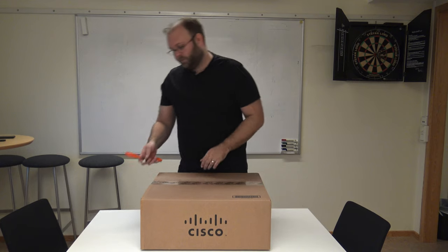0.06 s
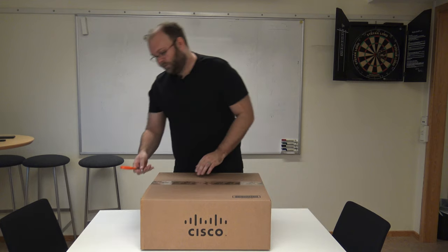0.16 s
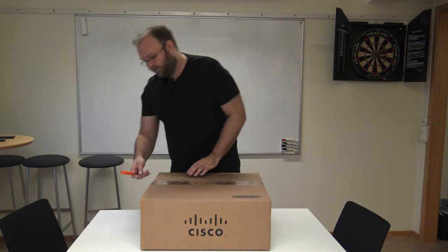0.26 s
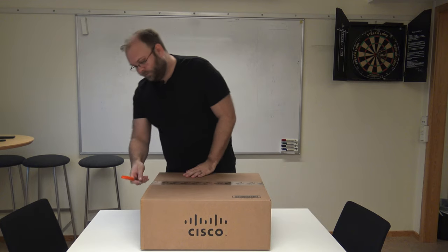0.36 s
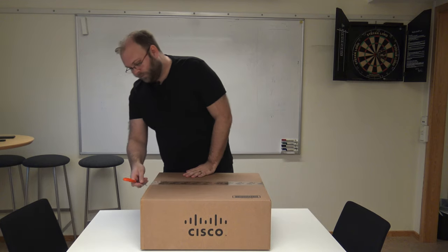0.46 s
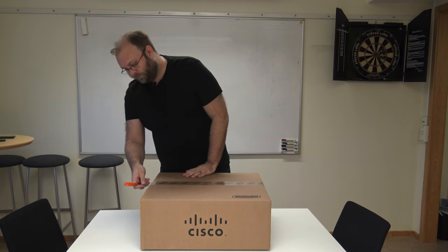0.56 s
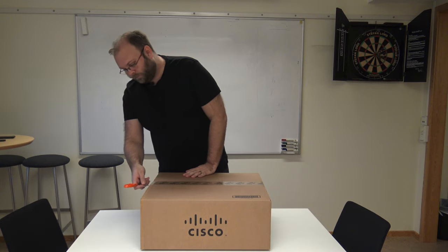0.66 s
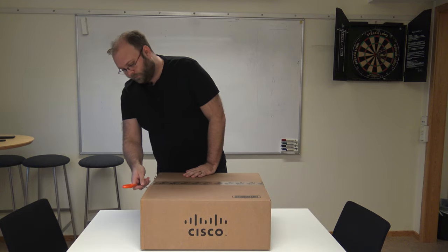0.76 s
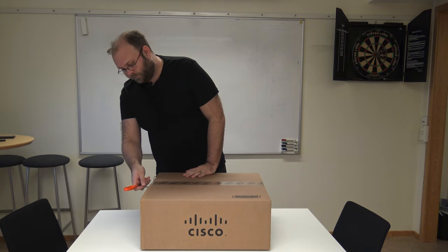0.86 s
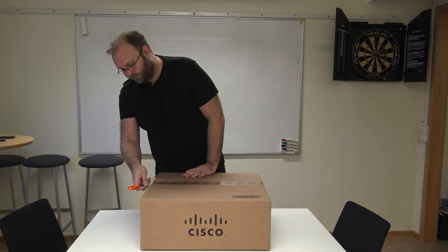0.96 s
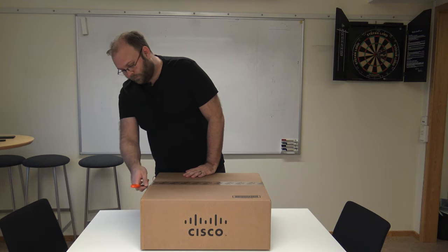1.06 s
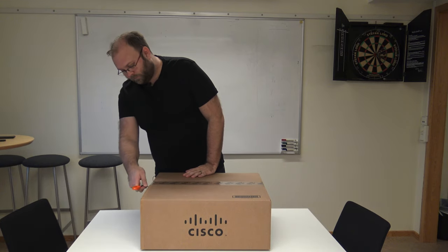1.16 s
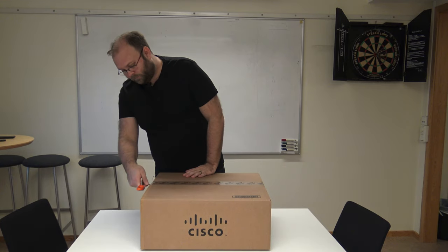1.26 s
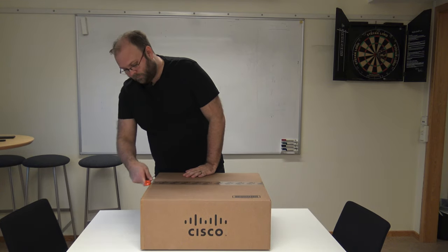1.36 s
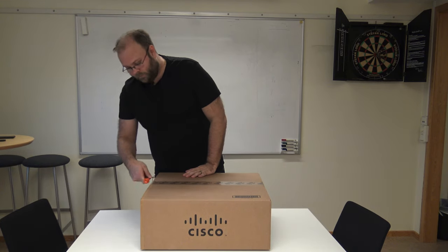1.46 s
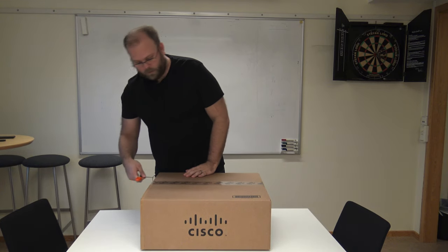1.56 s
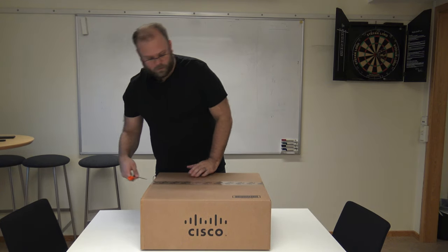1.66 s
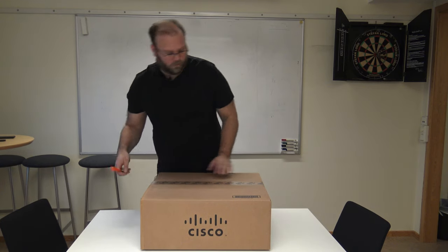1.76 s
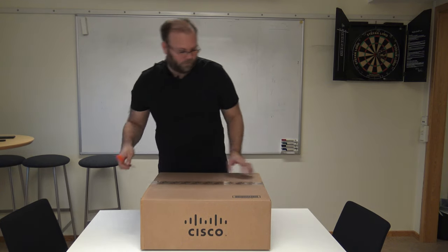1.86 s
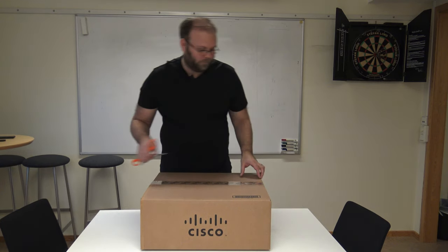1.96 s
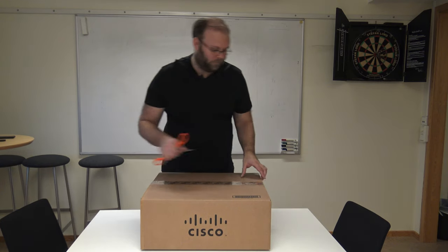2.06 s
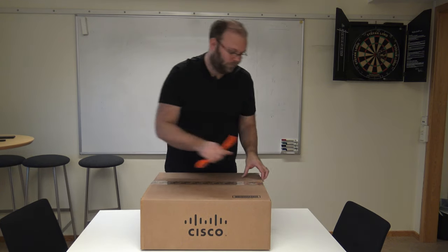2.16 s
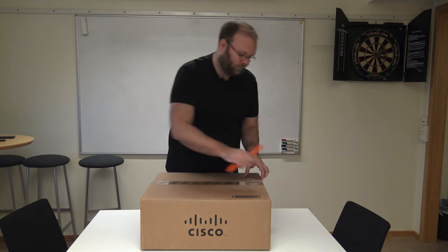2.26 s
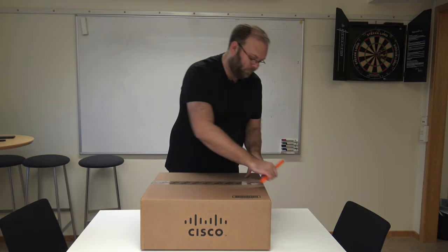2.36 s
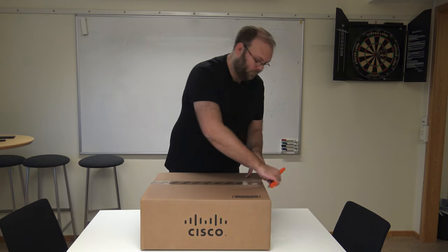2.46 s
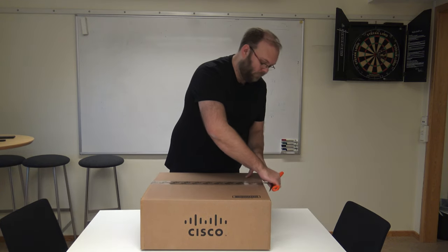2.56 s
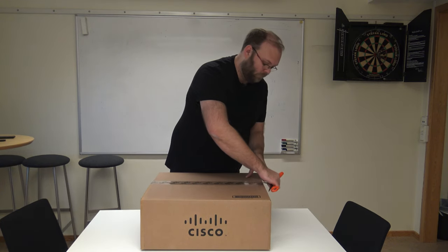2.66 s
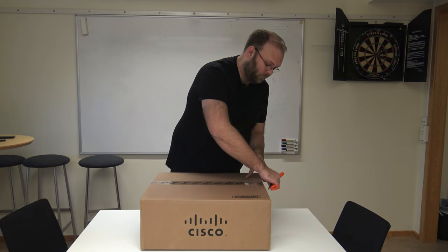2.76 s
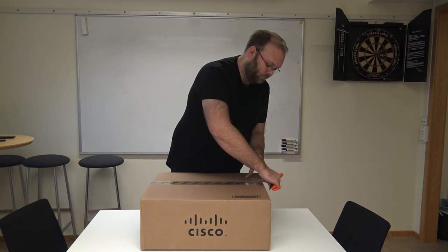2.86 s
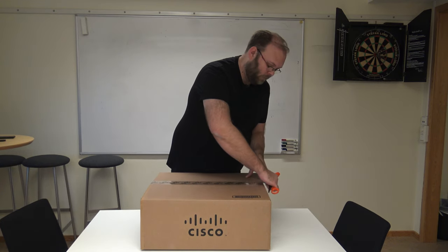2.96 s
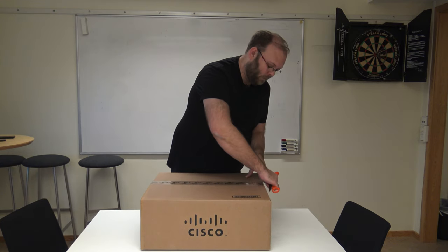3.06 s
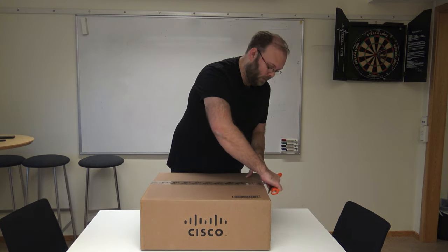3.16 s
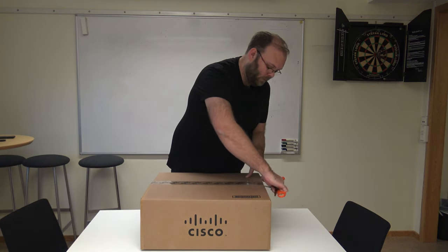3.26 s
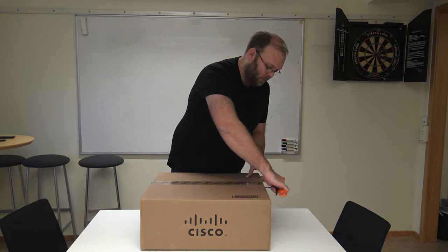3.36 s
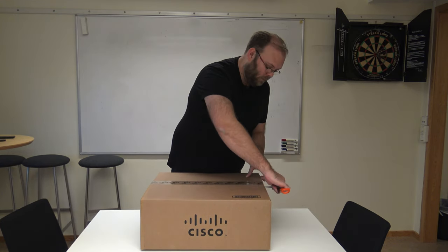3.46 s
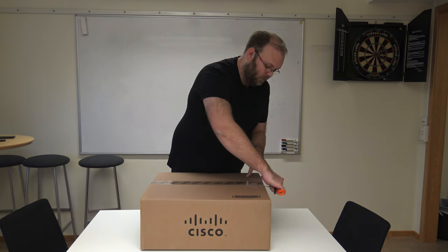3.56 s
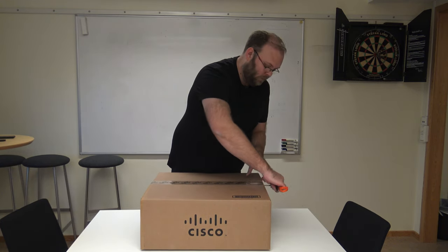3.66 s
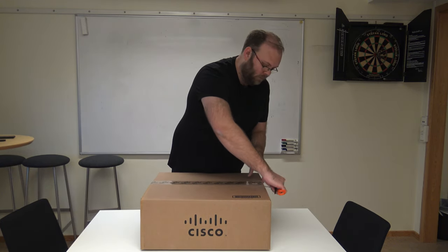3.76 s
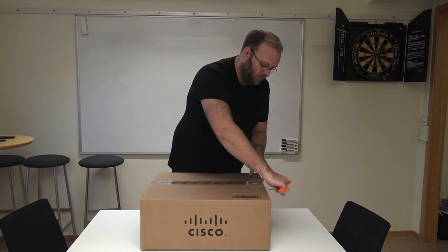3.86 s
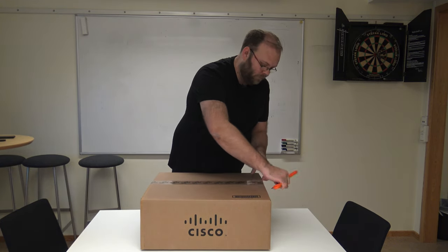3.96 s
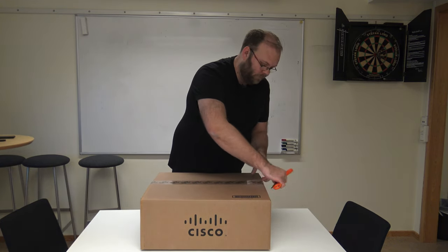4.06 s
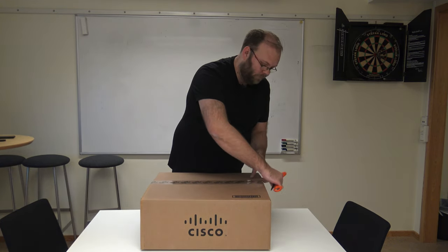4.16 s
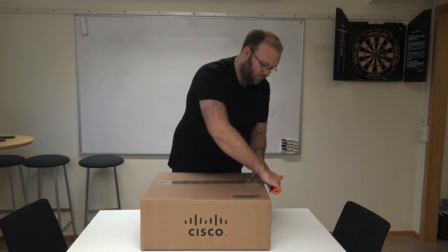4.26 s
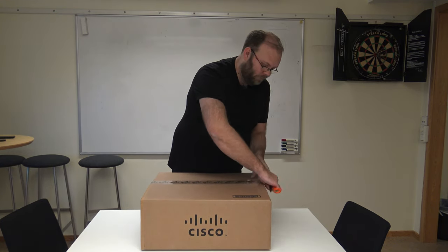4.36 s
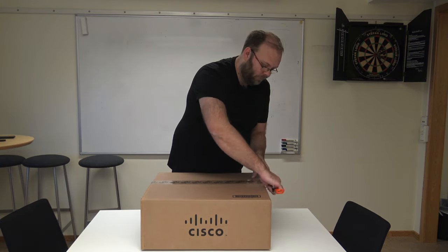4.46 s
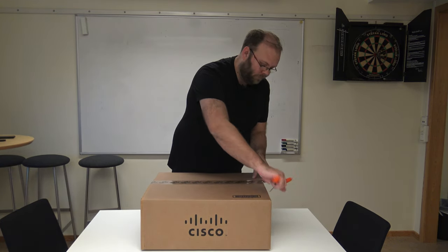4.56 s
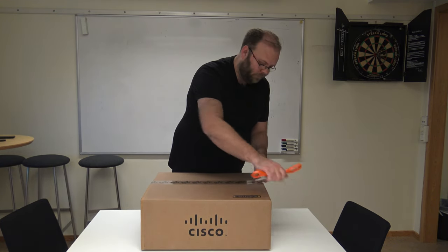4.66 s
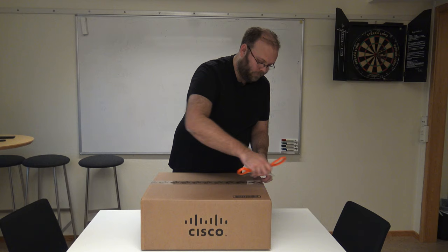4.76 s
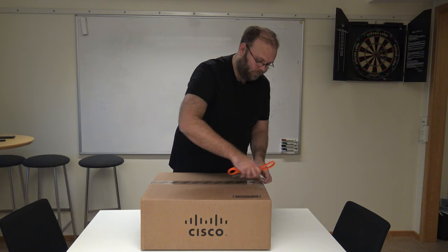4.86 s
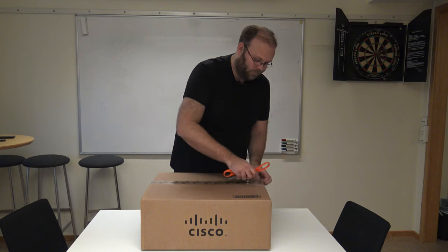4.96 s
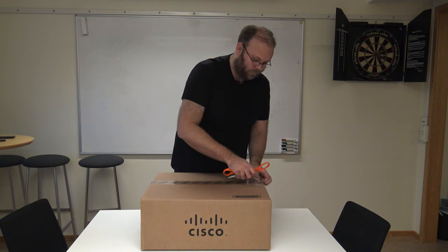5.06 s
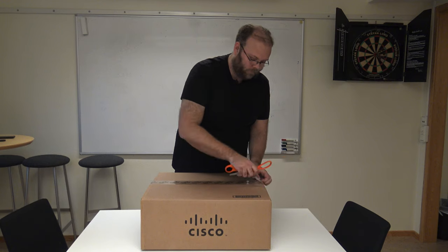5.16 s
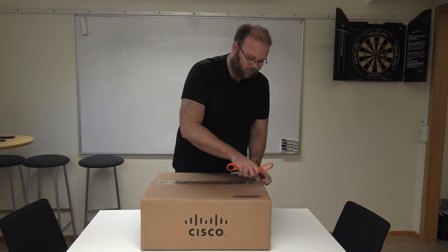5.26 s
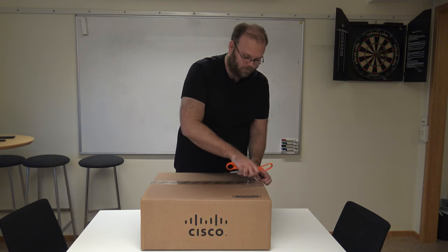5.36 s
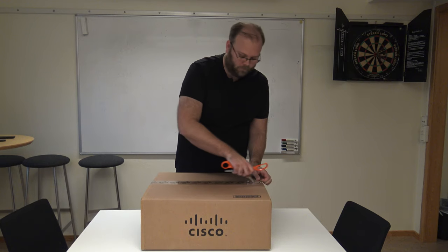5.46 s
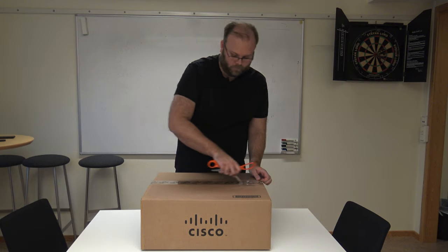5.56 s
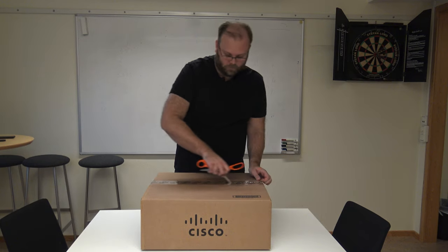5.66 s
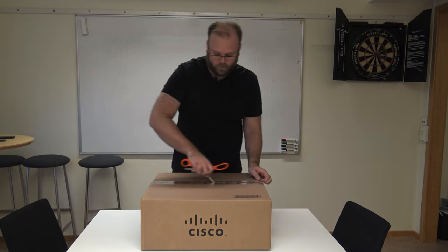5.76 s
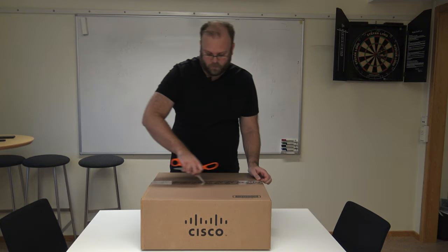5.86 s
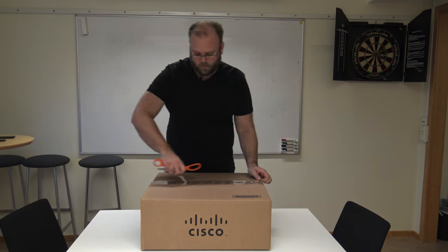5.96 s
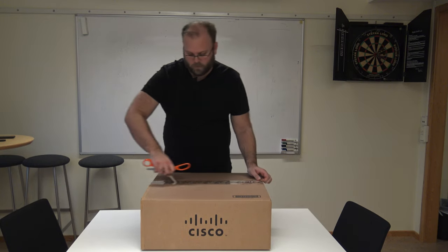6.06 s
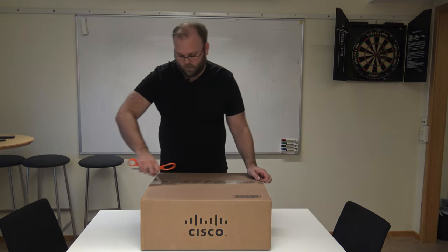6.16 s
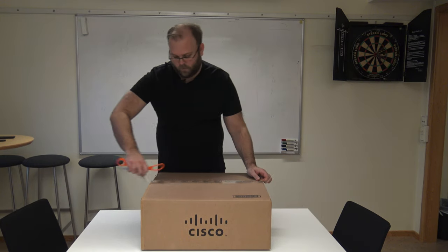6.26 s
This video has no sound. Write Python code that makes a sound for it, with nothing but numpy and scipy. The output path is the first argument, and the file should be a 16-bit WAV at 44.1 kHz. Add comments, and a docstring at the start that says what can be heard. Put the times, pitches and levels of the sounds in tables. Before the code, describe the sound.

Scissor blades clink, then cut in short snapping, knocking strokes at a cardboard box's taped ends before a long hissing scrape along its seam.

```python
"""Scissors open the packing tape of a cardboard box on a table in a bare, echoing room.
The blades, modelled as ringing steel modes and rubbing noise, clink; tape snaps as short bursts of noise.
Short strokes at the ends, then a long pull along the top seam, hiss and rasp as streams of random tiny jerks.
Knocks and slips ring the panel modes of the hollow box, and sleeves rustle over a quiet ventilation rumble.
A single microphone hears it all, directly and off the walls; both channels are the same."""
import sys
import numpy as np
from scipy import signal
from scipy.fft import rfft, irfft, next_fast_len
from scipy.io import wavfile
from scipy.ndimage import uniform_filter1d, map_coordinates

SR = 44100
rng = np.random.default_rng(int(sys.argv[2]) if len(sys.argv) > 2 else 0)


def transcribe(u):
    """Save the signal u as a 16-bit wav file named by the first command-line argument.

    u: samples, shape (n,) or (channels, n), limited to [-1, 1]; the rate is SR.
    q: integer samples, one column per channel.
    """
    v = np.clip(np.atleast_2d(u).T, -1, 1)
    q = np.round(v * 32767).astype(np.int16)
    wavfile.write(sys.argv[1], SR, q)


N = 278712  # samples

# short strokes of the blade at the ends of the box, levels at mid-stroke:
# start_s, length_s, tape_hiss_db, flap_rasp_db, box_boom_db, swell_db (start to end), hiss_pitch_hz
END_STROKES = [(0.968, 0.21, -66, -57.5, -62.5, 5, 7040), (1.297, 0.03, -47.5, -40, -64, 9, 5470),
               (1.345, 0.086, -45, -39, -40.5, 7, 6550), (1.443, 0.16, -53.5, -47.5, -49, -6, 5600),
               (1.636, 0.072, -61.5, -57, -59.5, -9, 7000), (3.02, 0.077, -62, -57, -63, -0.5, 8360),
               (3.209, 0.1, -51.5, -50, -57.5, 4.5, 8600), (3.333, 0.044, -41.5, -43.5, -39, 0, 8000),
               (3.41, 0.049, -53, -49, -54, -7, 5450), (3.601, 0.08, -52, -51.5, -55.5, 8.5, 8000),
               (3.879, 0.054, -53, -53.5, -53, 9, 8600), (4.229, 0.022, -52, -63, -50.5, 5, 11000),
               (4.29, 0.072, -69, -63, -59, 8, 6500), (4.404, 0.056, -66, -52.5, -54.5, -3, 7000),
               (4.469, 0.11, -51, -42.5, -49, 5, 5800), (4.595, 0.048, -47.5, -51, -50, -12, 10500),
               (5.33, 0.021, -51.5, -73, -36, 1, 7900)]
# the long pull along the top seam, levels before the layer trims: time_s, tape_hiss_db, box_boom_db, hiss_pitch_hz
SEAM_PULL = [(5.44, -72, -57, 8500), (5.498, -53.5, -48, 8600), (5.584, -46.5, -43, 8300),
             (5.684, -45.5, -42, 7600), (5.724, -44.5, -30, 6300), (5.81, -44, -34.5, 9900),
             (5.85, -45, -36, 6800), (5.94, -47.5, -31, 6550), (6.0, -46.5, -32, 8100),
             (6.07, -44, -31.5, 6200), (6.1, -46.5, -37, 8600), (6.135, -48, -32.5, 8500),
             (6.274, -47.5, -35.5, 8000), (6.32, -47, -46, 8000)]


def amp(db):
    """Decibels to gain."""
    return 10 ** (np.asarray(db) / 20)


def unit(x):
    """Scale to rms 1."""
    return x / np.sqrt(np.mean(x ** 2) + 1e-20)


def attack_unit(x):
    """Scale so that the loudest 4 ms have rms 1."""
    return x / np.sqrt(uniform_filter1d(x ** 2, size=176).max())


def along(points, hz):
    """Read a curve of (Hz, value) points, joined on a log frequency axis."""
    point_hz, values = np.transpose(points)
    return np.interp(np.log(hz + 1), np.log(point_hz + 1), values)


def curve(rows):
    """One value per sample for each column after the time."""
    times, *columns = np.transpose(rows)
    return [np.interp(np.arange(N) / SR, times, column) for column in columns]


def filtered(x, response):
    """Multiply the spectrum of x by a response of frequency."""
    size = next_fast_len(len(x) + 8192)  # silence after the end, so the filter's tail does not wrap
    spectrum = rfft(x, size) * response(np.fft.rfftfreq(size, 1 / SR))
    return irfft(spectrum, size)[:len(x)]


def coloured(x, colour):
    """Filter x by a curve of (Hz, dB) points, at rms 1."""
    return unit(filtered(x, lambda hz: amp(along(colour, hz))))


def wobble(rate):
    """A smooth random curve, rate knots a second."""
    knots = rng.standard_normal(int(N * rate / SR) + 4)
    return map_coordinates(knots, [np.arange(N) * rate / SR])


def add(track, s, sound):
    """Mix a sound in at s seconds."""
    part = track[max(round(s * SR), 0):][:len(sound)]
    part += sound[:len(part)]


def reach(hz, centre_hz, octaves):
    """A hump on the octave axis: the part of the spectrum that a contact excites."""
    distance = np.log2((hz + 1) / centre_hz) / octaves
    return 1 / (1 + distance ** 2)


def crack(centre_hz, octaves, t60, rise_cycles=0.3):
    """A toneless burst: dying noise, its spectrum evened out round a centre; dull bursts start more softly."""
    t = np.arange(SR // 12) / SR
    burst = rfft(rng.standard_normal(len(t)) * amp(-60 * t / t60))
    hump = reach(np.fft.rfftfreq(len(t), 1 / SR), centre_hz, octaves) ** 2
    even = irfft(burst / np.abs(burst) ** .8 * hump, len(t))  # most of the noise's own peaks are flattened
    rise = 1 - np.exp(-t * centre_hz / rise_cycles)
    fade = np.cos(np.pi / 2 * t / t[-1]) ** 2
    return attack_unit(even * rise * fade)


def slips(rate, spread_db):
    """Stick and slip: tiny jerks at random times, about rate a second, of very unequal size, at rms 1."""
    happens = rng.random(N) < rate / SR
    return unit(happens * rng.standard_normal(N) * amp(spread_db * rng.standard_normal(N)))


def stroke(start, length, swell_db):
    """Gain of one hand movement: a quick attack, a hold that swells or sags, a release."""
    attack_s, release_s, fade_db = 0.018, 0.041, 32.5  # each time is that of a fade by fade_db
    t = np.arange(N) / SR - start
    outside = np.maximum(-t / attack_s, 0) + np.maximum((t - length) / release_s, 0)
    gain_db = swell_db * (np.clip(t / length, 0, 1) - .5) - fade_db * outside
    return amp(np.maximum(gain_db, -200))


def panels(centre_hz, octaves, scatter_db):
    """The cardboard's ring after one push: damped modes, strongest near the centre of the push."""
    # cardboard panel modes: mode_hz, level_db (before scatter), t60_s
    box_modes = [(94, 2, 0.11), (118.5, 3.5, 0.073), (193, -1.5, 0.027), (248.2, -3.5, 0.061),
                 (285.3, 0, 0.029), (343.5, -0.5, 0.025), (460, -1, 0.039), (538, 2.5, 0.014),
                 (714, 5.5, 0.012), (919, 1.5, 0.019), (1070, 2, 0.015), (1228, -0.5, 0.022),
                 (1427, 4, 0.0067), (1752, 3, 0.011), (2170, 4.5, 0.0041), (2810, -59, 0.003)]
    hz, db, t60 = np.transpose(box_modes)[:, :, None]
    t = np.arange(SR // 12) / SR
    sign = (-1) ** np.arange(len(hz))[:, None]  # neighbouring modes push opposite ways
    size = sign * reach(hz, centre_hz, octaves) * amp(db + scatter_db * rng.standard_normal(hz.shape))
    return np.sum(size * amp(-60 * t / t60) * np.sin(2 * np.pi * hz * t), axis=0)


def shaken(jerks, centre_hz, octaves):
    """A run of jerks through the box's panels, at rms 1."""
    return unit(signal.oaconvolve(jerks, panels(centre_hz, octaves, scatter_db=1))[:N])


def background():
    """Steady ventilation rumble and hiss over a slow drift of air pressure."""
    # colour of the quiet room: hz, level_db (relative)
    room_air = [(12, -33), (20, 1), (39, -1), (74, -18), (127, -7.5), (228, -17), (434, -19), (1530, -31.5),
                (2320, -33), (2820, -37.5), (6540, -33), (11400, -41), (16000, -39)]
    drift_colour = [(1, -20), (2.5, 0), (7, 0), (11, -25), (40, -70), (200, -120)]  # hz, level_db
    drift = filtered(rng.standard_normal(N), lambda hz: amp(along(drift_colour, hz)))
    ventilation = coloured(rng.standard_normal(N), room_air)
    return amp(-59.0) * ventilation + amp(-51.5) * unit(drift)


def clinks(ring_db=-4, bite_s=0.0021, octaves=0.47):
    """The blades grind past each other; the rubbing rings their modes, damped by the hand."""
    # the scissor blades: mode_hz, level_db (relative), t60_s
    blade_modes = [(1230, -11, .05), (2584, 12, 0.11), (2970, 9, .12), (3990, 6, .1), (4570, 2, 0.11),
                   (5389, -13, 0.068), (6070, 5, 0.054), (6400, -2, 0.041), (6800, -3, 0.091),
                   (7130, -1, 0.062), (7144, -6, 0.066), (7305, -2, 0.075), (7440, 5, 0.057),
                   (7990, 6, 0.06), (9000, 7, 0.054), (9840, 7, 0.11), (10140, 5, 0.038),
                   (10430, -1, 0.054), (11380, 6, 0.041), (11750, -3, .08)]
    # colour of steel rubbing on steel: hz, level_db (relative)
    grind_colour = [(500, -28), (1200, -1.5), (2400, -10), (4000, -12), (7000, 4), (8800, -8), (11000, 1),
                    (13000, -10), (16000, -4)]
    # the blades meet: time_s, level_db, rub_t60_s, centre_hz (of the excited modes)
    meetings = [(0.013, -44.5, 0.26, 7050), (0.046, -29.5, 0.039, 8200), (0.056, -40.5, 0.18, 7500),
                (0.186, -59, 0.06, 6500), (1.833, -42.5, 0.057, 10400), (1.84, -54, 0.052, 5970),
                (2.043, -43.5, 0.043, 10200)]
    track, t = np.zeros(N), np.arange(SR // 3) / SR
    hz, mode_db, t60 = np.transpose(blade_modes)[:, :, None]
    modes = amp(mode_db - 60 * t / t60) * np.sin(2 * np.pi * hz * t)
    for s, db, rub_t60, centre_hz in meetings:
        force = amp(-60 * t / rub_t60) * (1 - np.exp(-t / bite_s))
        rub = force * coloured(rng.standard_normal(len(t)), grind_colour)
        ring = np.sum(modes * reach(hz, centre_hz, octaves), axis=0)
        steel = signal.fftconvolve(force * rng.standard_normal(len(t)), ring)[:len(t)]
        clink = attack_unit(rub) + amp(ring_db) * attack_unit(steel)
        add(track, s, amp(db) * attack_unit(clink))
    return track


def brush():
    """Sleeve and palm rustle softly as the arms move: dense random slips of cloth."""
    # arm movements: start_s, length_s, level_db (at mid-move), swell_db (start to end)
    arm_moves = [(0.4, 0.29, -70, -12), (0.836, 0.0058, -58, 11), (2.298, 0.69, -68.5, -13),
                 (2.71, 0.167, -64.5, 11), (4.978, 0.054, -64, -1)]
    # colour of the rustle: hz, level_db (relative)
    cloth_colour = [(59, -48), (100, -5.5), (260, -9), (442, -7), (736, -13.5), (1330, -18), (1870, -19),
                    (2800, -26), (11200, -24), (16000, -36)]
    moves = sum(amp(db) * stroke(start, length, swell_db) for start, length, db, swell_db in arm_moves)
    return moves * coloured(slips(rate=8100, spread_db=5.0), cloth_colour)


def knocks(crush_db=-1, crush_grows=0.53, crush_spread=1.71, crush_cycles=12):
    """A blow rings the panels and crushes the cardboard's flutes; the harder it is, the more the toneless thud prevails."""
    # hand or blade knocks the box: time_s, level_db, centre_hz (of the excited modes), spread_octaves
    blows = [(0.411, -51, 127.5, 0.72), (0.904, -38.5, 794, 0.26), (0.980, -45.5, 467, 0.88),
             (1.338, -21.5, 1800, 1.46), (1.397, -30.5, 870, 0.88), (1.434, -27.5, 440, 0.45),
             (1.439, -27, 795, 1.07), (1.487, -39.5, 500, 1.1), (1.677, -44.5, 900, 1.5),
             (1.727, -50.5, 800, 0.47), (2.044, -52.5, 111, 1.2), (2.358, -48.5, 516, 0.71),
             (2.5245, -41.5, 596, 0.5), (2.5398, -29.5, 350, 0.85), (2.58, -46, 950, 1),
             (2.543, -39.5, 132, 0.7), (2.965, -50.5, 495, 1.2), (3.216, -42, 900, 0.22),
             (3.2374, -25, 194, 0.38), (3.352, -27, 895, 1.1), (3.384, -30, 600, 1.4),
             (3.727, -45.5, 410, 0.97), (3.806, -47.5, 467, 0.52), (3.882, -43.5, 1140, 0.34),
             (3.931, -27, 1466, 0.13), (4.0789, -19, 1140, 0.78), (4.084, -21, 935, 0.35),
             (4.0886, -28, 68, 0.74), (4.091, -25.5, 422, 0.47), (4.245, -40.5, 1210, .4),
             (4.474, -28.5, 1200, 0.22), (4.988, -53.5, 870, 0.76), (5.012, -38.5, 180, 0.92),
             (5.021, -50.5, 600, 0.6), (5.253, -50.5, 1110, 0.44), (5.326, -34.5, 1916, 0.17),
             (5.330, -38.5, 272, 0.67), (5.351, -34.5, 484, 0.49), (5.992, -27, 410, 0.51),
             (6.064, -24, 195, 0.12)]
    track = np.zeros(N)
    typical_db = np.mean([row[1] for row in blows])
    for s, db, hz, octaves in blows:
        ring = attack_unit(panels(centre_hz=hz, octaves=octaves, scatter_db=3.0))
        crush = crack(hz, crush_spread * octaves, t60=min(crush_cycles / hz, .05))
        crush_gain = amp(crush_db + crush_grows * (db - typical_db))
        add(track, s, amp(db) * attack_unit(ring + crush_gain * crush))
    return track


def snaps(t60=0.005, octaves=1.4, ping_db=-4, ping_t60=0.011, ping_octaves=0.17, lead_in_db=-21, lead_in_t60=0.011):
    """Taut tape tears with a very short crack, a faint noise swell just before it, and the torn edge pings briefly."""
    # tape gives way under the blade: time_s, level_db, pitch_hz
    tape_breaks = [(0.874, -56.5, 2430), (1.1414, -44, 4040), (1.3391, -24.5, 5300), (1.3387, -22.5, 11600),
                   (1.3735, -37, 11000), (1.3858, -33, 10600), (1.391, -32, 10500), (1.3953, -31, 6500),
                   (1.403, -27, 6170), (1.414, -24, 10300), (1.62, -45.5, 6930), (1.653, -46.5, 6900),
                   (1.8856, -43, 6070), (2.5396, -42.5, 5300), (2.646, -53, 6600), (2.8674, -49, 7400),
                   (3.3388, -35, 11600), (3.347, -31, 7600), (3.3509, -25.5, 7900), (3.3546, -24, 5800),
                   (3.384, -41, 7500), (3.8938, -41, 5700), (3.929, -31.5, 7700), (4.0794, -22.5, 7340),
                   (4.0796, -34, 12400), (4.244, -33, 8200), (4.317, -50.5, 8360), (4.348, -39.5, 5100),
                   (4.4199, -44.5, 7500), (4.473, -43, 11800), (4.642, -35, 11000), (4.6522, -36, 10500),
                   (4.7915, -45, 9100), (5.346, -38, 8700), (5.5147, -39, 9400), (5.578, -33.5, 8100),
                   (5.597, -33.5, 8440), (5.985, -35.5, 8440)]
    track = np.zeros(N)
    for s, db, pitch_hz in tape_breaks:
        lead_in = crack(pitch_hz, octaves, lead_in_t60)[::-1]  # a faint reversed noise burst just before each crack
        add(track, s - len(lead_in) / SR, amp(db + lead_in_db) * lead_in)
        ping = crack(pitch_hz, ping_octaves, ping_t60)
        tear = crack(pitch_hz, octaves, t60)
        add(track, s, amp(db) * attack_unit(tear + amp(ping_db) * ping))
    return track


def blade_work():
    """Gains of hiss, rasp and boom: the pull along the seam, and short strokes that each drive all three."""
    hiss_trim_db, rasp_trim_db, boom_trim_db = -1.5, 3, -1.5
    hiss_db, boom_db, _ = curve(SEAM_PULL)
    pulling = np.arange(N) / SR > SEAM_PULL[0][0]
    # along the seam the flap's rasp follows the hiss
    layers = pulling * amp([hiss_db + hiss_trim_db, hiss_db + rasp_trim_db, boom_db + boom_trim_db])
    for start, length, tape_db, flap_db, box_db, swell_db, _ in END_STROKES:
        layers = layers + amp([[tape_db], [flap_db], [box_db]]) * stroke(start, length, swell_db)
    return layers


def lid_give():
    """The lid is stiff at its end and softens as the blade travels towards the middle."""
    edge_give, middle_give = 0.29, 0.6  # 0 stiff .. 1 soft
    pull_times = [SEAM_PULL[0][0], SEAM_PULL[-1][0]]
    return np.clip(np.interp(np.arange(N) / SR, pull_times, [edge_give, middle_give]), 0, 1)


def hiss_pitch():
    """The blade's angle sets the hiss pitch: held through each short stroke, wandering along the seam."""
    held = [(s, hz) for start, length, *_, hz in END_STROKES for s in (start, start + length)]
    wandering = [(s, hz) for s, *_, hz in SEAM_PULL]
    return curve(sorted(held + wandering))[0]


def focused(x, centre_hz):
    """Friction noise with a moving resonance and short random patches of colour, at rms 1."""
    focus_db, focus_octaves, patchy_db = 3, 0.29, 2
    hz, t, z = signal.stft(x, SR, nperseg=256)
    centre = np.interp(t, np.arange(N) / SR, centre_hz)
    patches = uniform_filter1d(rng.standard_normal(z.shape), size=5, axis=0)  # smooth over frequency
    patches = unit(uniform_filter1d(patches, size=12, axis=1))  # smooth over time
    gain_db = focus_db * reach(hz[:, None], centre, focus_octaves) + patchy_db * patches
    return unit(signal.istft(z * amp(gain_db), SR, nperseg=256)[1][:N])


def scrape():
    """The sliding blade hisses in the tape; its jerks shake flap and box, and paper fibres break one by one."""
    # colour of sliding friction in the tape: hz, level_db (relative)
    tape_colour = [(1650, -39), (2800, -7.5), (2970, -11.5), (3540, -7), (4980, -3), (5760, -1.5),
                   (7280, -1.5), (8730, -1), (10500, -4.5), (12200, -5), (13400, -7), (15200, -8),
                   (16000, -22)]
    crackle_per_s, crackle_db = 182, -19  # stray small tears, relative to the hiss
    hiss, rasp, boom = blade_work()
    give = lid_give()
    grip = amp(0.73 * wobble(70))  # the blade catches and runs free
    drag = amp(2.6 * wobble(32))  # slower unevenness of rasp and boom
    jerks = slips(rate=3000, spread_db=2.0) * grip
    edge = shaken(jerks, centre_hz=468, octaves=0.74)
    lid = shaken(slips(rate=1200, spread_db=2.0) * grip, centre_hz=224, octaves=0.57)
    flap = shaken(jerks, centre_hz=1480, octaves=1.0)
    fibres = shaken(slips(rate=220, spread_db=2), centre_hz=1400, octaves=1.1)
    friction = coloured(slips(rate=9000, spread_db=3.0) * grip, tape_colour)
    film = focused(friction, hiss_pitch())
    tears = coloured(slips(rate=crackle_per_s, spread_db=4), tape_colour)
    body = np.sqrt(give) * lid + np.sqrt(1 - give) * edge
    cardboard = drag * (boom * body + amp(-6.5) * rasp * (flap + fibres))
    return cardboard + hiss * (film + amp(crackle_db) * tears)


def judder():
    """Regular stick and slip at the taped edge: the lid throbs at the slip rate, each slip rattles the flap."""
    # the blade judders through: time_s, rate_hz (slips per second, before jitter)
    slip_rates = [(4.475, 107), (4.525, 123), (4.595, 182), (4.64, 86), (4.66, 122)]
    throb_db, throb_rise_db_per_s = -50, 39  # the lid throbs harder as the blade sinks in
    rattle_db, rattle_fade_db_per_s = -41.5, 73  # the flap's rattle dies as the tape parts
    squeak_db = -6  # the flap's upper squeak
    first, last = slip_rates[0][0], slip_rates[-1][0]
    rate_hz, = curve(slip_rates)
    t = np.arange(N) / SR
    cycles = np.cumsum(rate_hz * (1 + 0.03845 * wobble(80))) / SR
    jerks = np.diff(np.floor(cycles), prepend=0) * amp(3.0 * wobble(160))  # one per whole cycle
    elapsed = np.clip(t, first, last) - first
    throb = amp(throb_db + throb_rise_db_per_s * elapsed) * unit(np.sin(2 * np.pi * cycles))
    squeak = shaken(jerks, centre_hz=1770, octaves=0.038)
    flap = shaken(jerks, centre_hz=1166, octaves=0.21) + amp(squeak_db) * squeak
    rattle = amp(rattle_db - rattle_fade_db_per_s * elapsed) * flap
    return (throb + rattle) * (t > first) * (t < last)


def in_room(x, build_up_s=0.003):
    """The walls' answer: overlapping stretches of sound each get a fresh random echo tail, dying by frequency."""
    # strength of the echoes: hz, level_db (relative)
    wall_colour = [(50, -7), (110, -1.5), (400, 2.5), (1500, -2), (3000, 1), (7000, 1.5), (11000, -1.5),
                   (15000, 3)]
    # how long the room rings: hz, t60_s
    room_decay = [(100, 0.83), (260, 0.72), (700, 0.65), (1840, 0.54), (5000, 0.65), (8000, 0.45),
                  (12800, 0.35), (16000, 0.42)]
    hop, echoes = SR // 3, np.zeros(N + SR)
    window = np.sin(np.linspace(0, np.pi, 2 * hop))
    padded = np.pad(x, (hop, 2 * hop))
    for start in range(0, N + hop, hop):
        hz, t, z = signal.stft(rng.standard_normal(2 * hop), SR, nperseg=256)
        tail_db = along(wall_colour, hz)[:, None] - 60 * t / along(room_decay, hz)[:, None]
        tail = signal.istft(z * amp(tail_db), SR, nperseg=256)[1]
        # the first echoes need 4 ms to arrive
        tail = tail * np.clip((np.arange(len(tail)) / SR - .004) / build_up_s, 0, 1)
        stretch = padded[start:start + 2 * hop] * window
        add(echoes, start / SR, signal.fftconvolve(stretch, tail / np.linalg.norm(tail)))
    return echoes[hop:hop + N]


def impacts(count=3):
    """Several random draws of the hits feed the echoes, for a smoother tail; the first is also heard directly."""
    draws = [(snaps(), knocks(), clinks()) for _ in range(count)]
    echoes = sum(in_room(amp(-7.3) * cracks + amp(-5.0) * blows + amp(-4.5) * steel)
                 for cracks, blows, steel in draws)
    return sum(draws[0]) + echoes / np.sqrt(count)


def scene():
    """Everything reaches one microphone, the same in both channels; all but the background echoes off the walls."""
    sliding = scrape() + judder() + brush()
    mono = sliding + amp(-4.5) * in_room(sliding) + impacts() + background()
    return np.array([mono, mono])


def record(dry):
    """The microphone dulls the very top, and nothing is kept above the band limit."""
    # microphone response: hz, level_db
    mic_response = [(100, -0.5), (12500, -0.5), (14500, -5.5), (16000, -15)]
    top_hz, skirt_hz = 16350, 400  # band limit, and the width of the slope below it

    def response(hz):
        """Microphone curve times the band limit."""
        return amp(along(mic_response, hz)) * np.clip((top_hz - hz) / skirt_hz, 0, 1)

    return np.array([filtered(channel, response) for channel in dry])


dry = scene()
out = record(dry)
transcribe(out)
```